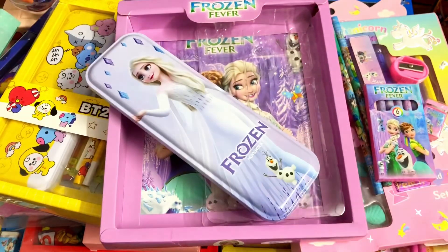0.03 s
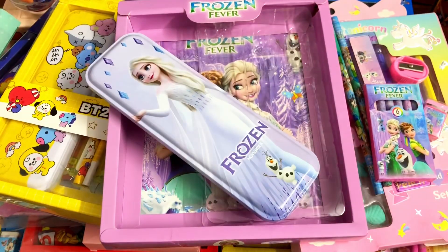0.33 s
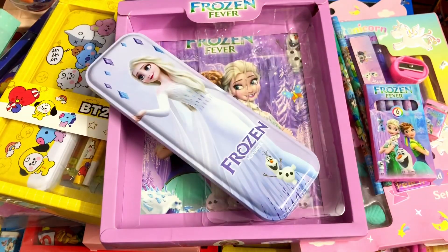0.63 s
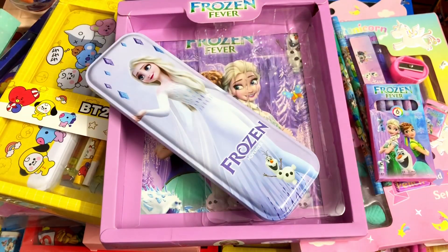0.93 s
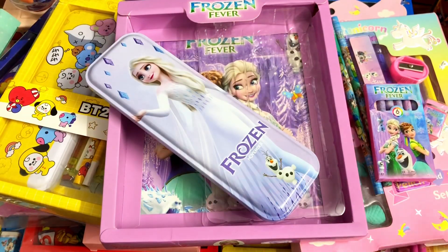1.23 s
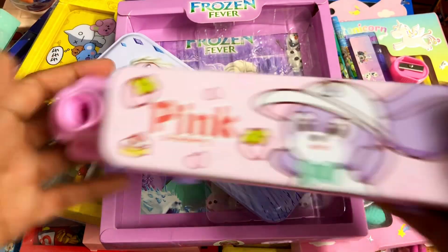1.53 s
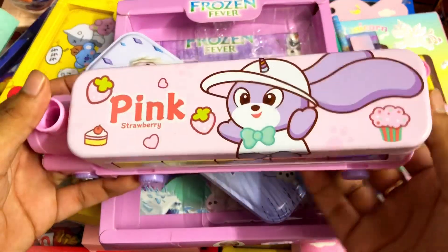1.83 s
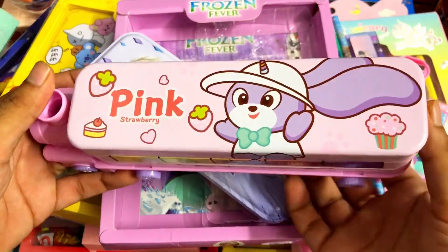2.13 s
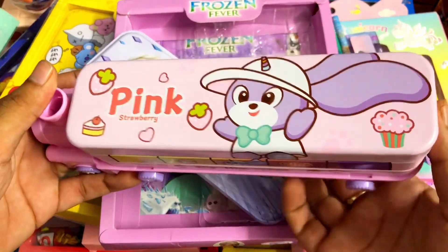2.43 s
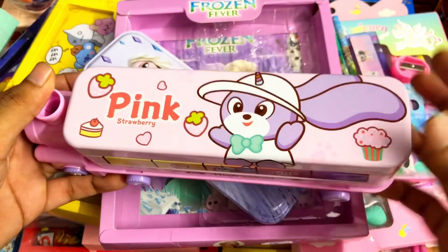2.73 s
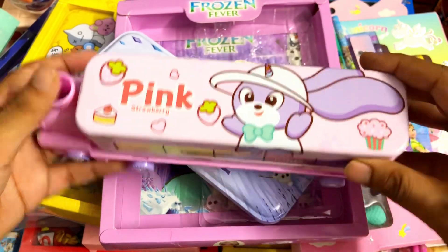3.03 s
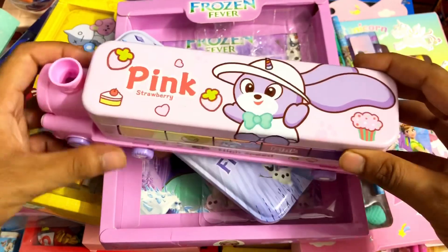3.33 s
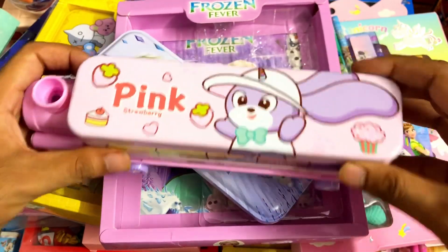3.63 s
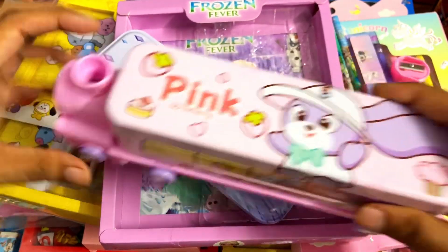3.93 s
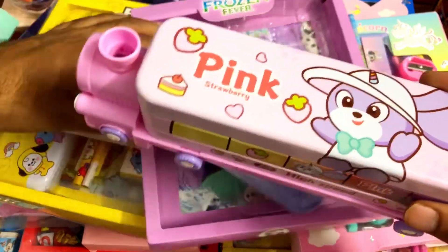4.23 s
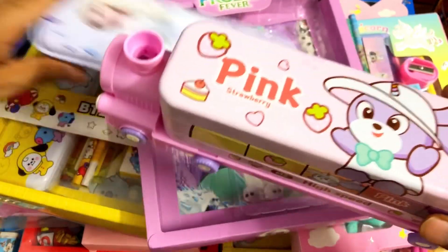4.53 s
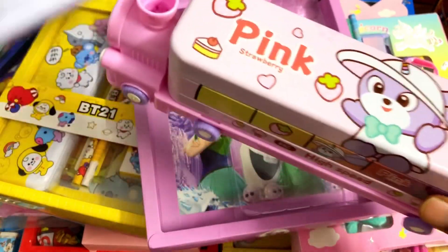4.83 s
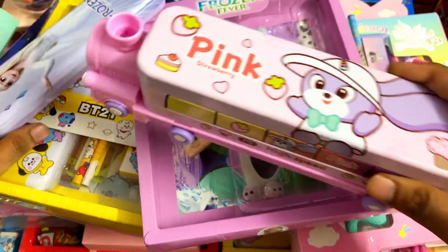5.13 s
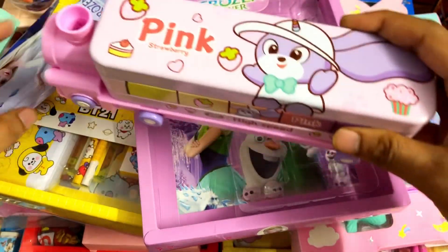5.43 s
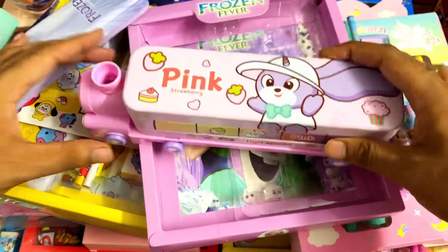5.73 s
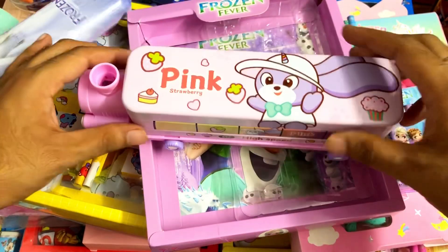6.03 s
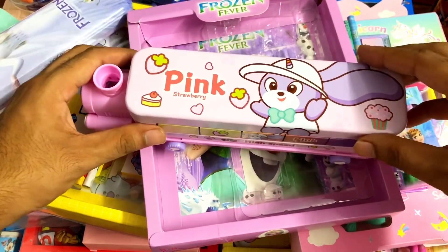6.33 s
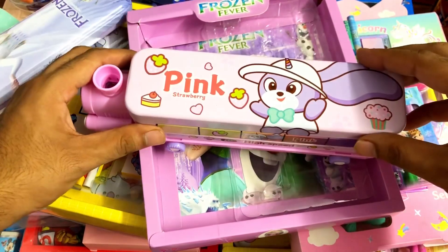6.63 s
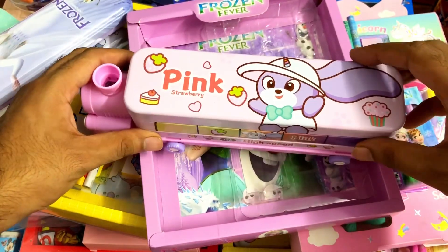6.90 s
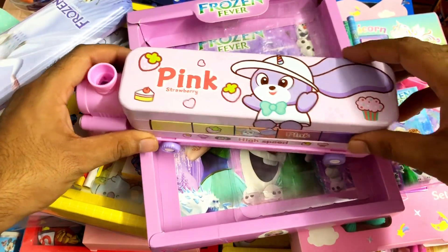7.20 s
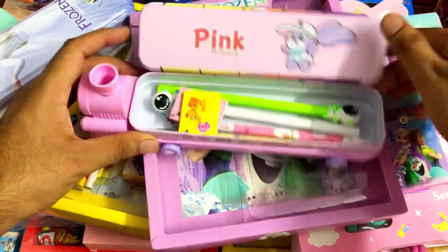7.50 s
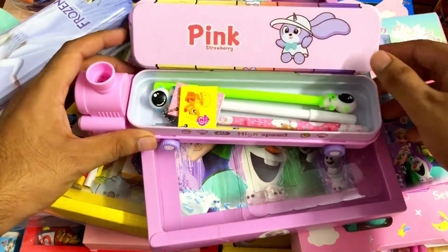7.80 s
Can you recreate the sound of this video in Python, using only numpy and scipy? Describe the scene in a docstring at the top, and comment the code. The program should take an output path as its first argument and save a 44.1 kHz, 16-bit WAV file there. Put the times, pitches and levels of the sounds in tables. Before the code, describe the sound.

A fan hums quietly in a bare room while hands pick up a tin pencil case and turn it with light taps, rubs and tiny squeaks. A second, flat tin scrapes out of a tray and clatters down. The case is set down with a loud knock and a dull thud. Its lid clicks and scrapes as it is prised open, and pens rattle inside. Each knock rings briefly in the room.

```python
"""A fan hums in a bare room, and hands brush over a tin pencil case on a plastic chassis.
The case is picked up and turned, with taps, rubs and small squeaks. A second, flat tin is dragged
out of a tray and dropped aside. The case is set down on the tray and prised open; pens rattle inside.
Knocks and scrapes set the thin metal ringing, the tray thuds, and the room rings after every knock."""
import sys
import numpy as np
from scipy import signal
from scipy.fft import rfft, irfft
from scipy.io import wavfile
from scipy.ndimage import uniform_filter1d, map_coordinates

SR = 44100
rng = np.random.default_rng(int(sys.argv[2]) if len(sys.argv) > 2 else 0)


def to_wav(s):
    """Save 16-bit WAV."""
    ch = np.atleast_2d(s).T  # columns
    pcm = np.round(np.clip(ch, -1, 1) * 32767)  # PCM
    wavfile.write(sys.argv[1], SR, pcm.astype(np.int16))


N = 351036
TIME = np.arange(N) / SR


def amp(db):
    """Turns decibels into a number to multiply by."""
    return 10 ** (np.asarray(db) / 20)


def unit(x):
    """Scales a signal to an average (rms) strength of one."""
    return x / np.sqrt(np.mean(x ** 2) + 1e-20)


def read(points, hz):
    """Looks up a frequency in a table, drawing straight lines between rows on a pitch scale."""
    row_hz, value = np.transpose(points)
    return np.interp(np.log(hz + 1), np.log(row_hz + 1), value)


def add(mix, start, sound):
    """Mixes a sound in at a start time in seconds."""
    part = mix[round(start * SR):][:len(sound)]
    part += sound[:len(part)]


def coloured(x, colour):
    """Gives a signal a colour (its balance of low and high) and a strength of one."""
    gain = amp(read(colour, np.fft.rfftfreq(N, 1 / SR)))
    return unit(irfft(rfft(x) * gain, N))


def drift(turns_per_s):
    """Wanders smoothly from one random value to the next."""
    return map_coordinates(rng.standard_normal(400), [TIME * turns_per_s], order=3, mode="wrap")


def loudness(spans, attack_s=0.014, ease_db=-6, release_s=0.075):
    """The loudness of stretches of sound: each one starts quickly, eases, and fades out."""
    out = np.zeros(N)
    for start, length, db in spans:
        t = np.arange(0, length, 1 / SR)
        edges = np.minimum(t / attack_s, 1) * np.minimum((length - t) / release_s, 1)
        add(out, start, edges * amp(db + ease_db * t / length))
    return out


def sharpest_click(gain):
    """The shortest click that has the given strength at each frequency."""
    log_gain = np.log(np.maximum(np.r_[gain, gain[-2:0:-1]], 1e-5))
    return np.fft.ifft(np.exp(np.conj(signal.hilbert(log_gain)))).real


def buzz(fade_s):
    """A dying rattle of loose parts; any fade time below 0.5 ms counts as 0.5 ms."""
    fade = np.exp(-np.arange(4096) / SR / max(fade_s, .0005))
    x = rng.standard_normal(len(fade)) * fade
    for _ in range(3):
        x = irfft(np.exp(1j * np.angle(rfft(x))))  # make all frequencies equally strong
        x = x * fade / np.sqrt(abs(uniform_filter1d(x ** 2, size=96)) + 1e-20)  # restore the fade
    return x / np.linalg.norm(x)


# borders between a knock's four ranges, low to high: thump, hollow, clack, bright (frequency [Hz])
BAND_EDGES = [400, 1200, 4500]
def strikes(rows, colour, click_share, spot_db, chatter_stretch=1.0):
    """Each blow is a click and a buzz. Its level sets the clack; the other ranges are relative to it."""
    hz = np.fft.rfftfreq(4096, 1 / SR)
    below = [1 / (1 + (hz / edge) ** 6) for edge in BAND_EDGES]
    bands = np.diff([0 * hz, *below, np.ones(len(hz))], axis=0)
    out = np.zeros(N)
    for start, db, thump_db, hollow_db, bright_db, chatter_s in rows:
        blow = np.sqrt(1 - click_share) * buzz(chatter_s * chatter_stretch)
        blow[0] += np.sqrt(click_share)
        # every spot on the box favours other pitches
        spot = np.interp(hz, np.geomspace(200, 16000, 60), rng.standard_normal(60))
        shape = amp(read(colour, hz) + spot_db * spot)
        band_dbs = [thump_db, hollow_db, 0, bright_db]  # weight adds thump, hard edges add brightness
        gain = sum(amp(band_db) * unit(shape * band) for band_db, band in zip(band_dbs, bands))
        add(out, start, amp(db) * signal.fftconvolve(blow, sharpest_click(gain)))
    return out


def rough_noise(spans, colour, clicks_per_s, spread_db):
    """A stream of tiny clicks of uneven size, like surfaces that stick and slip."""
    size = amp(spread_db * np.minimum(rng.exponential(1, N), 4))
    clicks = size * rng.choice([-1, 1], N) * (rng.random(N) < clicks_per_s / SR)
    return loudness(spans) * coloured(clicks, colour)


def ring(force, tones, ring_db):
    """A contact ripples across the metal, low pitches slowest, and leaves dying tones behind."""
    travel_s = 0.00053  # crossing time at 1000 Hz
    lag_cycles = 2 * travel_s * np.sqrt(1000 * np.fft.rfftfreq(N + SR, 1 / SR))
    ripple = irfft(rfft(force, N + SR) * np.exp(-2j * np.pi * lag_cycles), N + SR)[:N]
    t, body = np.arange(SR) / SR, np.zeros(SR)
    for hz, db, fade_s in tones:
        tone = np.cos(2 * np.pi * hz * t) * amp(-60 * t / max(fade_s, .01))
        # higher tones gather energy from a wider range of frequencies
        body += amp(db) * tone / np.linalg.norm(tone) * np.sqrt(hz / SR)
    return ripple + amp(ring_db) * signal.fftconvolve(ripple, body)[:N]


# the fan's low tones (pitch [Hz], level [dB])
FAN_TONES = [(49, -60.5), (74, -60.5), (99.5, -54), (124, -58), (194, -61.5), (222, -69.5)]
# colour of the fan's rush of air (frequency [Hz], level [dB])
AIR_COLOUR = [(25, -27.5), (50, 4.5), (110, -4.5), (220, 3.5), (350, -5), (550, -8), (850, -24.5),
              (1200, -18), (1900, -22.5), (2800, -40), (4000, -36), (7500, -38.5), (9000, -52),
              (13000, -41.5), (16000, -52)]
# the background's level dips and recovers (time [s], level change [dB])
BACKGROUND_LEVEL = [(0, 1.5), (.45, -4), (1.1, 0.5), (3.3, 1.2), (5.6, .5), (6.6, -1.5), (7.1, 2)]
def fan():
    """A fan hums with wavering low tones in a soft rush of air."""
    hum = np.zeros(N)
    for hz, db in FAN_TONES:
        strength = np.sqrt(2) * amp(db + 1.8 * drift(5))
        hum += strength * np.sin(2 * np.pi * hz * TIME + .6 * drift(5))
    air = amp(-53.5) * coloured(rng.standard_normal(N), AIR_COLOUR)
    return (hum + air) * amp(np.interp(TIME, *np.transpose(BACKGROUND_LEVEL)))


# strokes of the hands (start [s], length [s], relative level [dB])
HAND_STROKES = [(.12, 0.2, -60), (1.365, 0.24, -50.5), (2.8, 0.18, -57.5), (5.47, 0.1, -57)]
# colour of their hiss (frequency [Hz], level [dB])
SKIN_COLOUR = [(1500, 2), (2800, -10), (3800, 0), (7500, -2), (9000, -15), (12500, -6.5), (16000, -5.5)]
def brushing_hands():
    """Skin slides over smooth surfaces with a soft, high hiss."""
    hiss = coloured(rng.standard_normal(N), SKIN_COLOUR)
    return amp(-10) * loudness(HAND_STROKES) * hiss


# the case's ringing tones (pitch [Hz], relative level [dB], time to fade by 60 dB [s])
CASE_TONES = [(227.9, 4.5, 0.42), (269.8, 6, 0.19), (336, 11, 0.061), (476, -1, 0.19), (530, 4.5, 0.053),
              (668, -0.5, 0.39), (801, 1, 0.22), (1028, -15, 0.11), (1234, -3.5, 0.12), (1490, -46, 0.13),
              (1755, -1.5, 0.027), (1985, -4.5, 0.096), (2780, -35, 0.11), (3693, -2.5, 0.027),
              (4126, -5, 0.027), (5840, -5.5, 0.013), (6700, -27, 0.053)]
def pencil_case():
    """Everything that touches the case, outside or inside, sets the same metal ringing."""
    sounds = case_knocks() + lid_clicks_and_pens() + case_rubs_and_wash() + lid_scrapes()
    return ring(sounds, CASE_TONES, ring_db=-10)


# colour of the case's sounds (frequency [Hz], level [dB])
CASE_COLOUR = [(30, -20), (85, 5), (250, 1.5), (600, -1.5), (1000, -2), (1900, -3), (2400, -8),
               (3100, -10.5), (4300, -7.5), (6000, -15.5), (7600, -15), (8500, -25.5), (11000, -22.5),
               (15500, -27)]
# fingers and nails tap as the grip shifts (time [s], relative level [dB], hollow [dB], bright [dB])
FINGER_TAPS = [(1.1751, -54.5, 2, -13), (1.496, -45, -5, 5.5), (1.544, -44.5, -6, -10),
               (1.576, -46, 7.5, 0.5), (2.14, -56, 4.5, -32), (2.166, -45.5, 4.5, -14),
               (2.453, -48, -14, -4.5), (2.607, -49.5, -2.5, -11.5), (2.967, -49.5, -15, -13),
               (2.974, -41.5, -13, -10), (3.018, -41, 0.5, -9), (3.067, -42.5, 4, -6), (3.091, -44, -4, -5),
               (3.137, -44, -10, -18), (3.184, -42.5, -8, -8), (3.209, -45, -4.5, -8),
               (3.275, -48, -13.5, -14), (3.405, -47.5, -11.5, -4), (3.454, -57, 9.5, 0),
               (3.553, -53, -6, -16), (3.638, -57, -2, -3.5), (3.7074, -50.5, -3, 0.5),
               (3.765, -50, -7, -16)]
# hard knocks (time [s], relative level [dB], thump [dB], hollow [dB], bright [dB], chatter [s])
HARD_KNOCKS = [(2.2895, -31, -6, 2.5, -6, 0.0063), (5.576, -18.5, -1.5, -1, -8, 0.00463),
               (5.606, -24, -9, -5.5, -1.5, 0.0059), (7.487, -31, 3, 5, -8, .012)]
# dull bumps of the plastic chassis (time [s], relative level [dB])
CHASSIS_BUMPS = [(5.502, -56), (5.584, -31), (5.598, -31), (6.02, -58.5), (6.933, -52.5), (7.175, -41)]
# what all bumps share (thump [dB], hollow [dB], bright [dB], chatter [s]; below 0 means shortest)
BUMP_TOUCH = (10.5, 3.5, -9, -0.02)
def case_knocks():
    """Fingers tap the case, and it knocks and bumps as it is turned and set down."""
    tap_thump_db, tap_chatter_s = -19, 0.0033
    taps = [(start, db, tap_thump_db, hollow_db, bright_db, tap_chatter_s)
            for start, db, hollow_db, bright_db in FINGER_TAPS]
    bumps = [(start, db, *BUMP_TOUCH) for start, db in CHASSIS_BUMPS]
    return amp(25) * strikes(HARD_KNOCKS + taps + bumps, CASE_COLOUR, click_share=0.016, spot_db=3)


# rubs on the case and, at 2.33 s, a wash after a knock (start [s], length [s], relative level [dB])
RUBS_AND_WASH = [(1.175, 0.15, -52.5), (1.54, 0.16, -38.5), (2.13, 0.14, -46), (2.33, 0.13, -35.5),
                 (3.005, 0.11, -37.5), (3.16, 0.072, -42.5), (3.39, 0.54, -54.5), (6.02, 0.085, -30)]
def case_rubs_and_wash():
    """Fingers and plastic rub the case; after the first hard knock, a rough wash of sound dies away."""
    return amp(-8.5) * rough_noise(RUBS_AND_WASH, CASE_COLOUR, clicks_per_s=830, spread_db=1)


# fingers and rims squeak
# (start [s], length [s], relative level [dB], first pitch [Hz], last pitch [Hz], roughness [factor])
SQUEAKS = [(2.965, 0.012, -49, 1950, 2120, 0.2), (3.178, 0.018, -42.5, 4340, 4750, 1.15),
           (3.394, 0.015, -45, 4100, 4180, 1.1), (3.453, 0.0041, -43.5, 4000, 4200, 0.8),
           (4.269, 0.0084, -44, 2580, 2410, 0.3), (6.929, 0.037, -44, 1313, 1217, 0.42),
           (7.327, 0.045, -39, 2460, 2430, 0.13), (7.332, 0.094, -34, 559, 558.4, 0.49)]
def squeaks(jitter_hz=403, overtone_db=-32):
    """Regular slipping makes a short gliding tone; uneven slips blur it."""
    out = np.zeros(N)
    for start, length, db, first_hz, last_hz, roughness in SQUEAKS:
        count = int(length * SR)
        wobble = unit(uniform_filter1d(rng.standard_normal(SR), size=50))[:count]
        pitch = np.linspace(first_hz, last_hz, count) + jitter_hz * roughness * wobble
        phase = 2 * np.pi * np.cumsum(pitch) / SR
        tone = np.sin(phase) + amp(overtone_db) * np.sin(2 * phase)
        add(out, start, amp(db) * tone * signal.windows.tukey(count, .5))
    return amp(2) * out


# the flat tin bumps the tray and lands
# (time [s], relative level [dB], thump [dB], hollow [dB], bright [dB], chatter before stretching [s])
TIN_HITS = [(4.058, -33.5, -6, 3.5, -18, 0.004), (4.09, -24, -4.5, -1.5, -8.5, 0.0037),
            (4.154, -38.5, 9.5, 3, 3, 0.0084), (4.198, -39.5, -12, -3.5, -10, 0.0027),
            (4.28, -41.5, 2.5, -11.5, -10, 0.004), (4.447, -50.5, 7.5, 1.5, -8, 0.007),
            (4.862, -21.5, -14, -24.5, -18.5, 0.008), (4.8672, -23, -2, 3, 0.5, 0.0057),
            (4.8862, -19, -3, -4.5, -0.5, 0.0036), (5.085, -39.5, 3.5, -5, -17, 0.012)]
# colour of those hits (frequency [Hz], level [dB])
TIN_COLOUR = [(35, -17), (70, 4), (250, 12.5), (600, 4.5), (1300, -2.5), (1950, -2.5), (2400, -12.5),
              (4200, -13.5), (7500, -15), (8500, -29), (10000, -19.5), (15500, -25)]
# the tin slides on the tray (start [s], length [s], relative level [dB])
TIN_SLIDES = [(4.065, 0.21, -24.5), (4.24, 0.21, -43.5)]
# colour of its rim sliding on plastic (frequency [Hz], level [dB])
SLIDE_COLOUR = [(40, -14.5), (90, 13), (300, -2.5), (800, 1), (1900, 0.5), (2600, -7.5), (4300, -7),
                (5500, -20.5), (6800, -10.5), (8600, -26), (10000, -19), (15500, -37.5)]
# the tin's ringing tones (pitch [Hz], relative level [dB], time to fade by 60 dB [s])
TIN_TONES = [(243.5, -1.5, 0.42), (310.6, 0.5, 0.17), (769, 2, 0.48), (1140, -8.5, 0.24), (1207, -3, 0.1),
             (1305, -3.5, 0.11), (1590, -14.5, 0.17), (1930, -6, .1), (2541, -10.5, .15),
             (3950, -3, 0.0089), (4500, -18, .06), (5930, -5, .02), (7580, -5, .02)]
def flat_tin():
    """The flat tin scrapes out of the tray and clatters down, its metal ringing."""
    blows = amp(22) * strikes(TIN_HITS, TIN_COLOUR, click_share=0.02, spot_db=3.5, chatter_stretch=.85)
    scraping = amp(-10.5) * rough_noise(TIN_SLIDES, SLIDE_COLOUR, clicks_per_s=4300, spread_db=3)
    return ring(blows + scraping, TIN_TONES, ring_db=-9)


# dull thuds (time [s], relative level [dB], pitch [Hz], time to fade by 60 dB [s])
TRAY_THUDS = [(4.086, -21.5, 71.5, 0.069), (4.151, -26, 198, 0.05), (5.58, -6, 96, 0.053),
              (5.594, -35, 103, 0.069), (6.027, -36, 87, 0.2), (7.171, -21, 99, 0.082),
              (7.485, -12, 182, 0.047)]
def tray_thuds(rise_cycles=0.15):
    """The tray and the boxes under it give way, take a moment to get moving, and swing a few times."""
    out, t = np.zeros(N), np.arange(SR // 2) / SR
    for start, db, hz, fade_s in TRAY_THUDS:
        rise = 1 - np.exp(-(t * hz / rise_cycles) ** 2)
        add(out, start, rise * amp(db - 60 * t / fade_s) * np.sin(2 * np.pi * hz * t))
    rumble_cut = signal.butter(2, 55, "high", fs=SR, output="sos")
    return signal.sosfilt(rumble_cut, out)


# colour of a touch on the lid's rim or inside the case (frequency [Hz], level [dB])
LID_COLOUR = [(30, -8), (75, 5), (250, 0.5), (600, 1.5), (1000, -0.5), (1900, -1), (2400, -7.5),
              (4300, -10.5), (7600, -16.5), (8500, -24.5), (11000, -19.5), (15500, -27)]
# clicks of the rim, then of the pens (time [s], relative level [dB])
LID_CLICKS = [(6.0305, -41), (6.088, -36.5), (6.174, -50.5), (6.275, -45), (6.3905, -42.5), (6.611, -44),
              (6.8035, -42), (6.9805, -40.5), (7.1615, -38.5), (7.201, -29), (7.293, -36), (7.33, -31.5),
              (7.41, -36), (7.767, -38)]
PEN_CLICKS = [(7.502, -24.5), (7.539, -26), (7.562, -26.5), (7.617, -27.5), (7.678, -33.5)]
# what each kind shares (thump [dB], hollow [dB], bright [dB], chatter [s]; below 0 means shortest)
LID_TOUCH = (-6, -3.5, -13.5, -0.23)
PEN_TOUCH = (-20.5, -7.5, -7.5, -0.06)
def lid_clicks_and_pens():
    """The rim catches and lets go as thumbs work it loose; the pens jump when the lid comes free."""
    lid = [(start, db, *LID_TOUCH) for start, db in LID_CLICKS]
    pens = [(start, db, *PEN_TOUCH) for start, db in PEN_CLICKS]
    return amp(25.5) * strikes(lid + pens, LID_COLOUR, click_share=0.0018, spot_db=3.5)


# scrapes of the lid (start [s], length [s], relative level [dB])
LID_SCRAPES = [(7.158, 0.17, -27.5), (7.31, 0.19, -23.5), (7.48, 0.15, -21), (7.63, 0.104, -29)]
def lid_scrapes():
    """The lid sticks and slips along its rim as it is prised up."""
    return amp(-9.5) * rough_noise(LID_SCRAPES, LID_COLOUR, clicks_per_s=1100, spread_db=2.5)


# how long the bare room rings (frequency [Hz], time to fade by 60 dB [s])
ROOM_FADE = [(80, 0.62), (250, 0.4), (700, 0.57), (1800, 0.5), (4000, 0.44), (8000, 0.44), (15000, 0.44)]
def room(x, table_db=-2, table_fade_s=0.13, build_up_s=0.0011, paths=7, paths_per_s=23):
    """Sound bounces off the table, then the walls; as the boxes move, it takes other paths."""
    t, out = np.arange(SR) / SR, x.copy()
    for path in range(paths):
        table, walls = rng.standard_normal((2, SR)) * (rng.random((2, SR)) < 6000 / SR)  # random echoes
        table *= amp(-60 * t / table_fade_s) * (t > .001)
        hz, age, spectrum = signal.stft(walls, SR, nperseg=256)
        spectrum = spectrum * amp(-60 * age / read(ROOM_FADE, hz)[:, None])
        tail = signal.istft(spectrum, SR, nperseg=256)[1][:SR]
        tail *= 1 - np.exp(-t / build_up_s)
        echoes = amp(table_db) * table / np.linalg.norm(table) + tail / np.linalg.norm(tail)
        away = (TIME * paths_per_s - path) % paths - paths / 2
        share = np.cos(np.pi / 2 * np.clip(away, -1, 1))  # each path fades smoothly into the next
        out += signal.fftconvolve(x * share, echoes)[:N]
    return out


def scene():
    """The handling sounds echo in the room over the fan, in one channel."""
    handling = pencil_case() + flat_tin() + tray_thuds() + squeaks() + brushing_hands()
    return (room(handling) + fan())[None]


def record(dry):
    """Rounds off the loudest peaks and removes the very highest treble."""
    ceiling, top_hz = .86, 16100
    rounded = dry / (1 + (dry / ceiling) ** 6) ** (1 / 6)
    treble_cut = signal.firwin(255, top_hz, window=("kaiser", 8), fs=SR)
    return signal.oaconvolve(rounded, treble_cut[None], "same")


dry = scene()
out = record(dry)
to_wav(out)
```